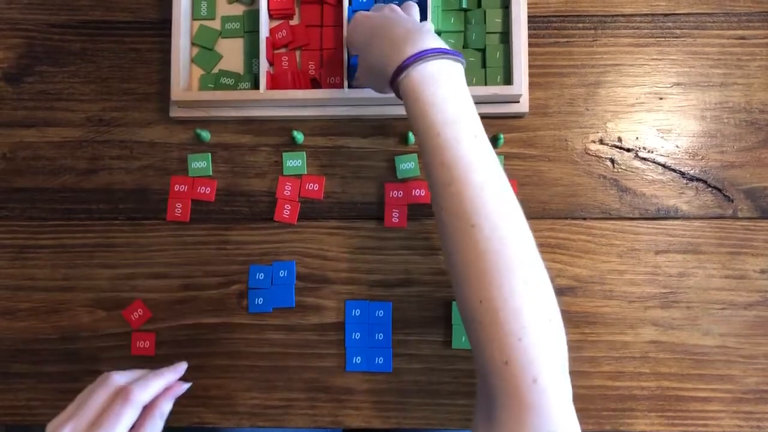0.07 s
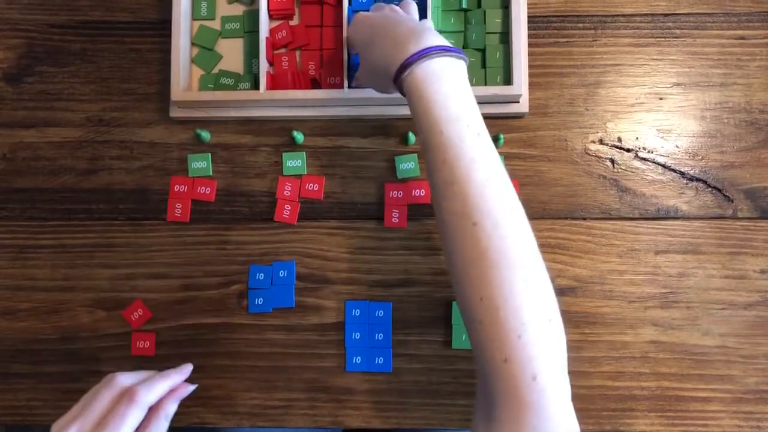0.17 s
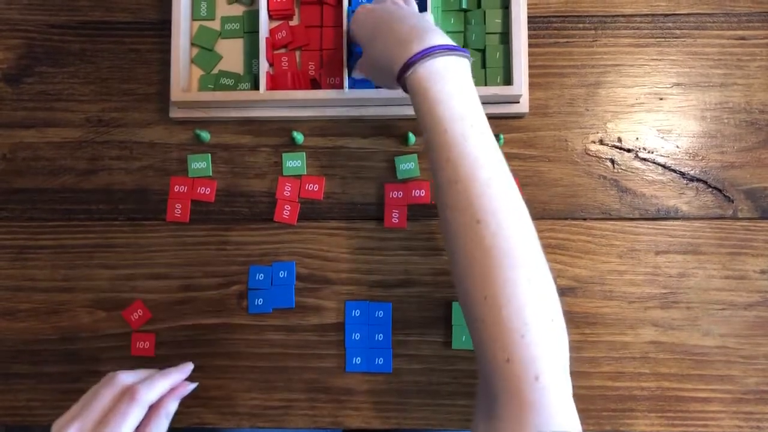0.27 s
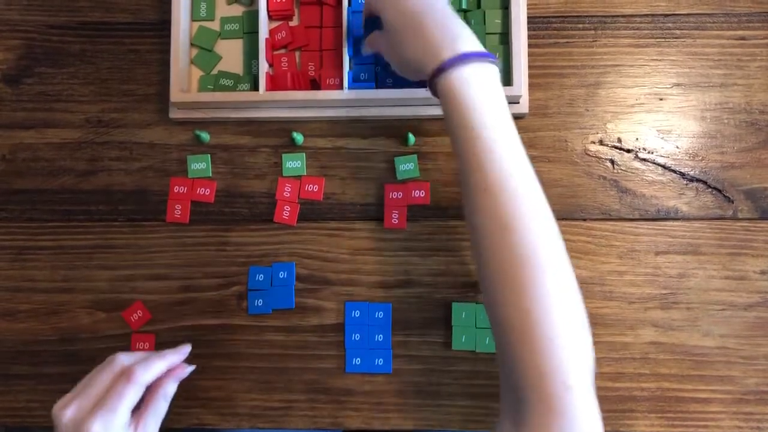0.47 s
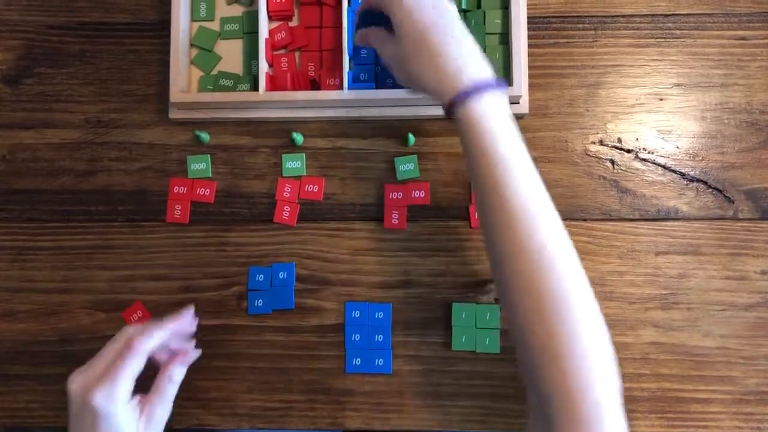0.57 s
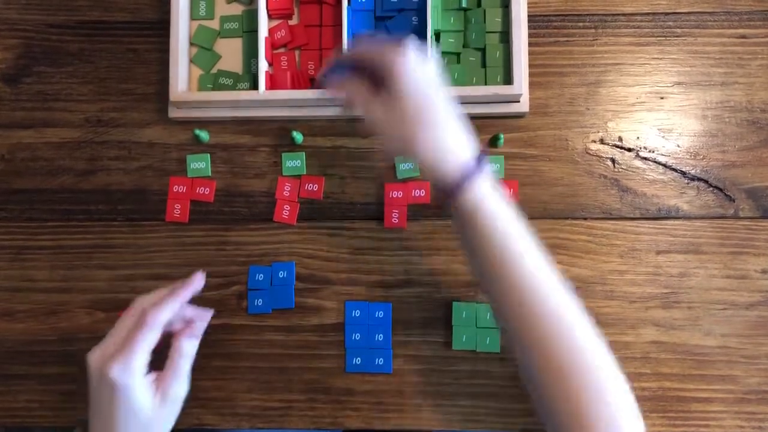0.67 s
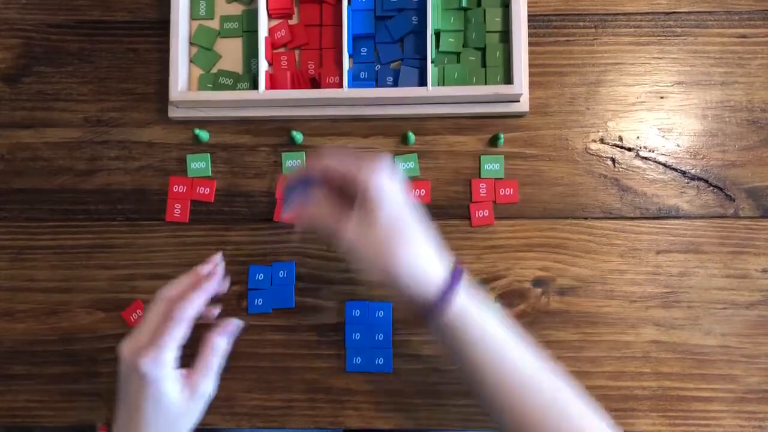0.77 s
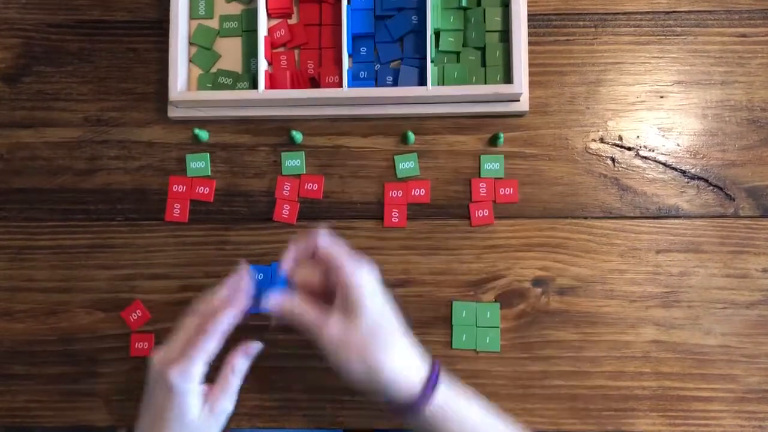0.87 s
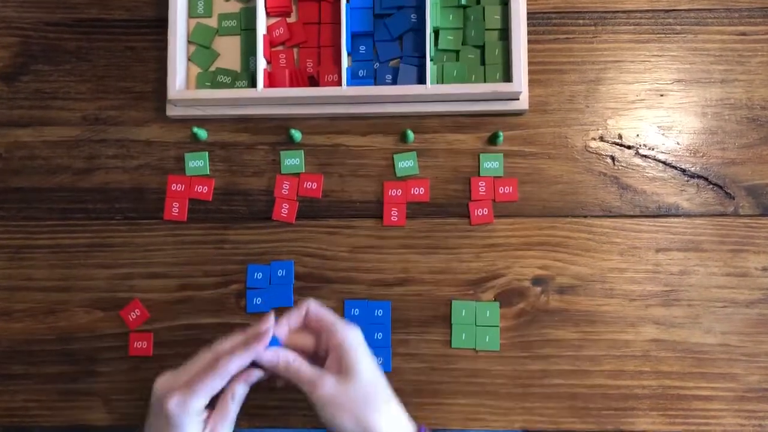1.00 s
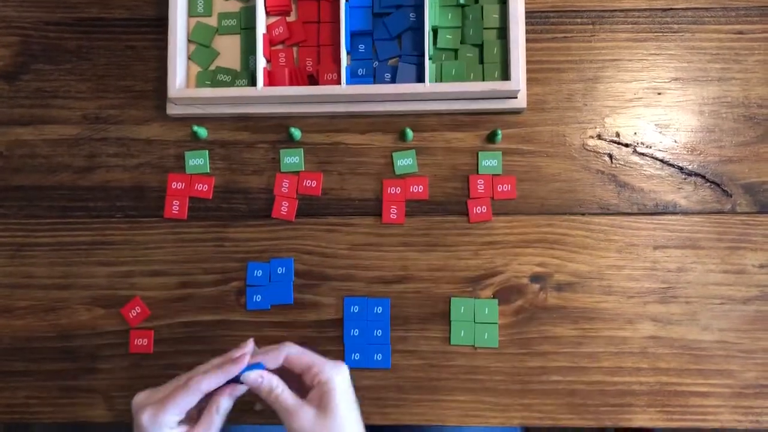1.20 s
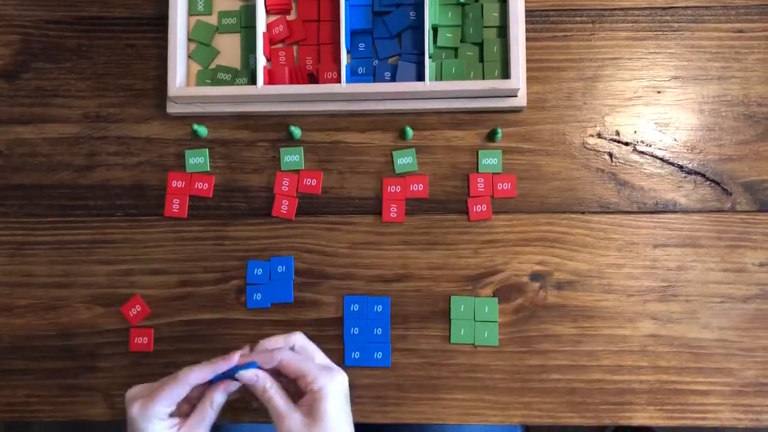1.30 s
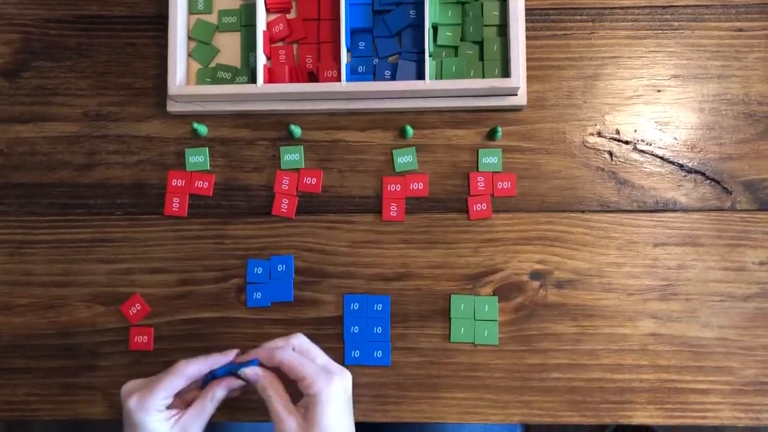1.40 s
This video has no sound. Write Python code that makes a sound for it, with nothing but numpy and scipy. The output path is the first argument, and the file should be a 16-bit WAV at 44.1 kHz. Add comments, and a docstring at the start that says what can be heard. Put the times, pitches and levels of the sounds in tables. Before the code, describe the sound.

Small hard tiles click together as a hand picks them from a wooden box.

```python
"""Small hard tiles click as a hand picks them out of a wooden box, on a table close to one microphone.
Each click is a crack and a very short high ring, and the box answers lower. Tiles slide in the heap;
the hand drags against the box and bumps it. The quiet room rings briefly after each click.
Later the fingers rub the tiles softly, over room air and a low hum."""
import sys
import numpy as np
from scipy import signal
from scipy.fft import rfft, irfft
from scipy.io import wavfile

SR = 44100
rng = np.random.default_rng(int(sys.argv[2]) if len(sys.argv) > 2 else 0)


def generate_wav(signal):
    """Clip the signal to [-1, 1] and save it as 16-bit WAV at the path in sys.argv[1]."""
    frames = np.transpose(np.atleast_2d(signal))
    scaled = np.clip(frames, -1, 1) * 32767
    pcm = np.round(scaled).astype(np.int16)
    wavfile.write(sys.argv[1], SR, pcm)


N = 63945
TIME = np.arange(N) / SR


def from_db(db):
    """Decibels to gain."""
    return 10 ** (np.asarray(db) / 20)


def rms_one(x):
    """Scale to an rms of 1."""
    return x / np.sqrt(np.mean(x ** 2) + 1e-20)


def at_hz(points, hz):
    """Read a table on a log-frequency axis."""
    freqs, values = np.transpose(points)
    return np.interp(np.log(np.maximum(hz, 1)), np.log(freqs), values)


def cut(x, hz, kind, order=2):
    """Butterworth filter."""
    sos = signal.butter(order, np.clip(hz, 1, .48 * SR), kind, fs=SR, output="sos")
    return signal.sosfilt(sos, x)


def noise(colour):
    """Noise with the given spectrum, rms 1."""
    gains = from_db(at_hz(colour, np.fft.rfftfreq(N, 1 / SR)))
    return rms_one(irfft(rfft(rng.standard_normal(N)) * gains, N))


def ring(modes, scatter_db=0, size=8000):
    """Struck modes (Hz, dB, t60 in seconds) as dying sines of alternating sign."""
    t = TIME[:size]
    out = np.zeros(size)
    for k, (hz, db, t60) in enumerate(modes):
        envelope = from_db(db + scatter_db * rng.standard_normal() - 60 * t / t60)
        out += (-1) ** k * envelope * np.sin(2 * np.pi * hz * t)
    return out


def swells(strokes):
    """Level of strokes that swell and fade in bell curves."""
    return sum(from_db(db) * np.exp(-.5 * ((TIME - centre) / half) ** 2) for centre, half, db in strokes)


def add(out, start_s, sound):
    """Mix a sound in at a time."""
    i = int(np.clip(start_s * SR, 0, N - 1))
    out[i:i + len(sound)] += sound[:N - i]


def room_tone(air_db=-64, waver_depth=0.17):
    """The quiet room itself: air and a slightly wavering low hum."""
    # Spectrum of the air. Each row: frequency in Hz, relative level in dB.
    air_colour = [(25, -40.5), (42, -13.5), (60, -2.5), (95, -6.5), (150, 0.5), (230, -1.5), (330, -4),
                  (500, -8), (1000, -14.5), (2000, -20.5), (4000, -28), (8000, -31), (15000, -37.5)]
    # Tones of the hum. Each row: frequency in Hz, rms level in dB.
    hum_tones = [(61, -77.5), (126, -69), (252.5, -70.5)]
    out = from_db(air_db) * noise(air_colour)
    for hz, db in hum_tones:
        waver = rms_one(cut(rng.standard_normal(2 * N), 11, "low")[N:])
        tone = np.sqrt(2) * np.sin(2 * np.pi * (hz * TIME + rng.random()))
        out += from_db(db) * (1 + waver_depth * waver) * tone
    return out


def tile_slides(grains_per_s=7000, low_hz=740):
    """Tiles scrape over each other in a dying run of tiny contacts."""
    # Slides in the heap. Each row: start, rise and t60 in seconds, level in dB, top edge in Hz.
    slides = [(0, 0.00067, 0.43, -54.5, 3960), (.229, 0.0067, 0.086, -48.5, 5020),
              (.335, 0.033, 0.68, -53.5, 4900), (.414, 0.0045, 0.36, -49.5, 5100)]
    out = np.zeros(N)
    for start, rise, t60, db, top_hz in slides:
        grains = rng.standard_normal(N) * (rng.random(N) < grains_per_s / SR)
        scrape = rms_one(cut(cut(grains, low_hz, "high", order=4), top_hz, "low"))
        age = np.maximum(TIME - start, 0)
        attack = np.minimum(age / rise, 1)
        out += scrape * attack * from_db(db - 60 * np.maximum(age - rise, 0) / t60)
    return out


def hand_drags():
    """Skin drags against the box with a low rumble."""
    # Strokes of the hand. Each row: centre and half length in seconds, level in dB.
    strokes = [(.005, 0.017, -56), (.11, .035, -60.5), (.54, 0.0093, -63.5)]
    # Spectrum of the rumble. Each row: frequency in Hz, relative level in dB.
    rumble_colour = [(50, -20), (130, -10), (230, 0), (350, -12), (700, -22), (2000, -43.5), (8000, -70)]
    return noise(rumble_colour) * swells(strokes)


def tile_knocks(size=8000):
    """Each contact cracks and rings a tile; a moment later the gap under it and the box floor answer."""
    # Contacts. Each row: start in seconds, tile ring in dB, its main pitch in Hz, crack in dB,
    # its top edge in Hz, box floor in dB, hollow clack of the gap in dB, its pitch in Hz.
    contacts = [(0.0367, -69, 6200, -51, 6000, -60, -38, 1060),
                (0.05, -30.5, 6580, -35.5, 7000, -45.5, -39.5, 970),
                (.1290, -57, 6930, -51.5, 8860, -60, -76.5, 3500),
                (0.2124, -63, 5380, -53.5, 3980, -53, -51, 2260),
                (.2442, -20, 7850, -18.5, 16000, -38.5, -42, 3110),
                (0.2543, -31.5, 6600, -32, 9000, -52.5, -49.5, 3010),
                (0.2554, -15, 8250, -18.5, 10900, -26, -29, 2895),
                (0.2982, -19, 8110, -16.5, 11500, -33.5, -26.5, 1995),
                (0.3073, -24, 7680, -44, 10000, -33, -23.5, 1740),
                (.3470, -40, 7000, -37, 5020, -35, -39, 2730),
                (.3640, -40, 5360, -42.5, 4530, -38.5, -31.5, 2910),
                (0.3775, -49, 5800, -44, 4300, -42.5, -44, 2700),
                (0.4129, -37.5, 6060, -40.5, 12000, -47, -40, 2500),
                (0.4527, -19, 6380, -25.5, 12900, -39, -27, 1300),
                (0.5638, -49.5, 5690, -53, 5000, -54, -58.5, 3500),
                (.9095, -62.5, 6330, -58.5, 13000, -74, -78, 3200),
                (1.2704, -52, 7750, -48, 7500, -67.5, -51, 2510)]
    # A tile's modes. Each row: multiple of the main pitch, relative level in dB, t60 in seconds.
    tile_modes = [(.6, -13.5, .008), (.7, -10, 0.0083), (0.809, -9, 0.0062), (1, 0.5, 0.0051),
                  (1.162, -8.5, 0.0055), (1.6, -31, 0.015), (1.83, -40.5, .005)]
    # Modes of the box floor and its heap. Each row: frequency in Hz, relative level in dB, t60 in seconds.
    floor_modes = [(929, -8, 0.014), (1187, -8, 0.018), (1632, -7, 0.013), (2080, -7.5, 0.016),
                   (2517, -3, 0.013), (3325, -3, 0.02), (4310, -3.5, 0.0091), (4820, -5.5, .007)]
    crack_t60_s, crack_low_share = 0.0045, 0.27  # lower edge as a share of the top edge
    floor_lag_s, floor_detune = .0009, 0.048  # pitch varies from spot to spot in the box
    gap_t60_s, gap_lag_s, gap_rise_s = 0.0076, .0007, 0.00039
    tiles, clacks = np.zeros((2, N))
    t = TIME[:size]
    for start, tile_db, tile_hz, crack_db, top_hz, floor_db, gap_db, gap_hz in contacts:
        crack = rng.choice([-1, 1], size) * from_db(crack_db - 60 * t / crack_t60_s)
        crack = cut(crack + 1e-18, crack_low_share * top_hz, "high")
        add(clacks, start, cut(crack, top_hz, "low"))
        tile = ring([(tile_hz * ratio, db, t60) for ratio, db, t60 in tile_modes])
        add(tiles, start, from_db(tile_db) * tile)
        spot = [(hz * (1 + floor_detune * rng.standard_normal()), db, t60) for hz, db, t60 in floor_modes]
        floor = cut(ring(spot, scatter_db=2) + 1e-18, 750, "high", order=4)
        add(clacks, start + floor_lag_s, from_db(floor_db) * floor)
        hollow = ring([(gap_hz, gap_db, gap_t60_s)]) * (1 - np.exp(-t / gap_rise_s))
        add(clacks, start + gap_lag_s, hollow)
    return tiles, clacks


def box_bumps():
    """Soft blows of the hand wake the low modes of the box; each blow has its own dullness."""
    # Blows. Each row: start in seconds, level in dB, top edge in Hz.
    blows = [(.309, -47, 180.5), (0.4179, -50.5, 1800), (.4270, -52.5, 900), (.4385, -49, 505)]
    # The whole box on the table. Each row: frequency in Hz, relative level in dB, t60 in seconds.
    box_modes = [(150, -11, 0.14), (262, -6.5, 0.069), (333, -0.5, .08), (539, -3.5, 0.046),
                 (850, -1, 0.086), (1020, 5.5, 0.027)]
    out = np.zeros(N)
    for start, db, top_hz in blows:
        add(out, start, from_db(db) * cut(ring(box_modes, scatter_db=4), top_hz, "low"))
    return out


def finger_rubs():
    """Skin hisses faintly over the tiles."""
    # Strokes of the fingers. Each row: centre and half length in seconds, level in dB.
    strokes = [(.72, .02, -86), (.955, 0.011, -73.5), (1.046, .035, -77), (1.128, 0.017, -72),
               (1.244, .05, -74.5), (1.386, 0.026, -76.5)]
    # Spectrum of the hiss. Each row: frequency in Hz, relative level in dB.
    hiss_colour = [(1000, -29), (2300, -5), (4500, -1), (8000, 3.5), (11000, -2), (15000, -5)]
    return noise(hiss_colour) * swells(strokes)


def room(x, tail_db=-8, onset_s=0.0017):
    """The room returns one early echo and a diffuse tail that lingers longest near 2 kHz."""
    # Echo off a nearby surface. Each row: delay in seconds, level in dB.
    echoes = [(.0098, -19)]
    # Spectrum of the tail. Each row: frequency in Hz, relative level in dB.
    tail_colour = [(200, 8.5), (600, 2), (1000, -3), (1800, 1), (3000, -5.5), (4700, 3), (6500, -8),
                   (8000, 4), (11000, -5), (15000, 0)]
    # Decay of the tail. Each row: frequency in Hz, t60 in seconds.
    tail_t60 = [(300, 0.15), (2000, 0.59), (5000, 0.4), (8000, 0.22), (15000, 0.22)]
    response = np.zeros(N)
    edges_hz = np.geomspace(120, 18000, 15)
    for low, high in zip(edges_hz, edges_hz[1:]):
        hz = np.sqrt(low * high)
        band = cut(rng.standard_normal(N), [low, high], "band")
        response += band * from_db(at_hz(tail_colour, hz) - 60 * TIME / at_hz(tail_t60, hz))
    response *= 1 - np.exp(-TIME / onset_s)
    response *= from_db(tail_db) / np.sqrt(np.sum(response ** 2))
    for delay, db in echoes:
        add(response, delay, from_db([db]))
    return signal.fftconvolve(x, response)[:N]


def scene():
    """Tiles, box and hand close to the microphone, with the room behind them, in mono."""
    tiles, clacks = tile_knocks()
    clatter = clacks + tile_slides() + box_bumps()
    reverb = room(clatter + from_db(-7.5) * tiles)  # the tiles' ring beams upwards, exciting the room less
    return (tiles + clatter + reverb + finger_rubs() + hand_drags() + room_tone())[None]


def record(dry, cutoff_hz=16300):
    """The microphone's signal passes a steep low-pass."""
    return signal.sosfilt(signal.ellip(10, .2, 70, cutoff_hz, fs=SR, output="sos"), dry)


dry = scene()
out = record(dry)
generate_wav(out)
```